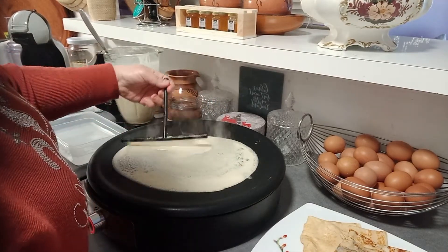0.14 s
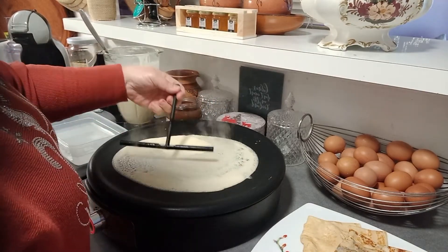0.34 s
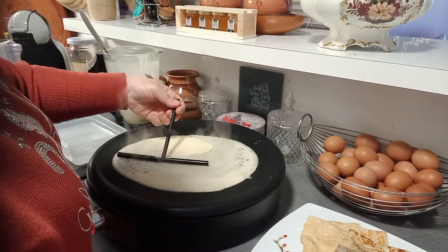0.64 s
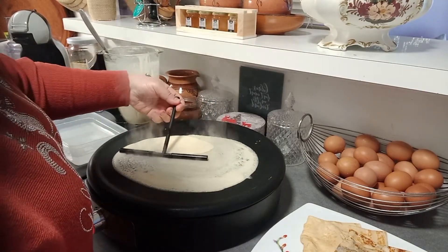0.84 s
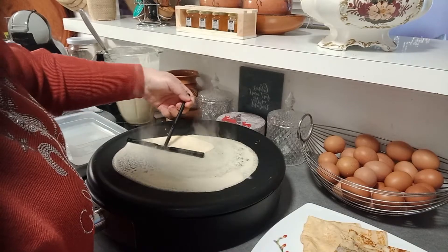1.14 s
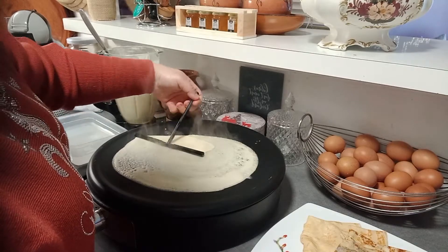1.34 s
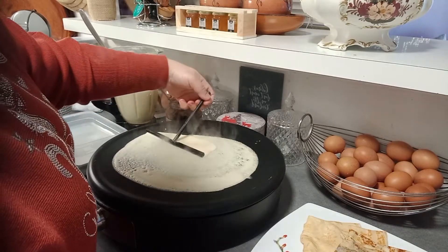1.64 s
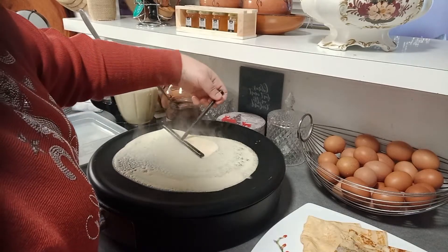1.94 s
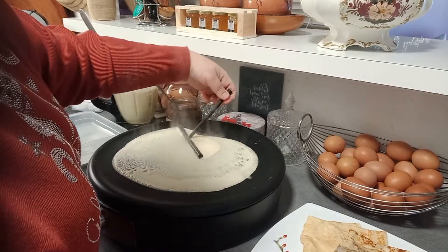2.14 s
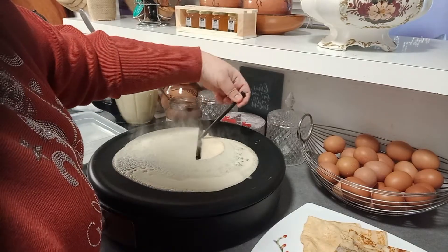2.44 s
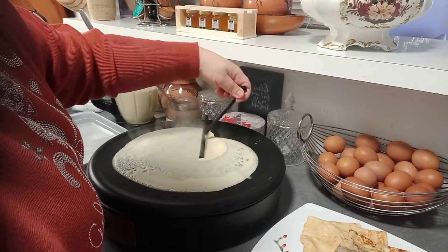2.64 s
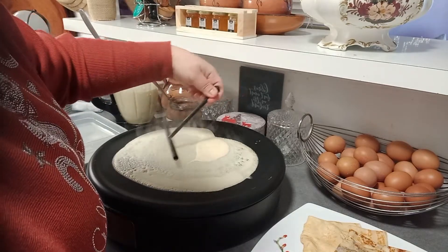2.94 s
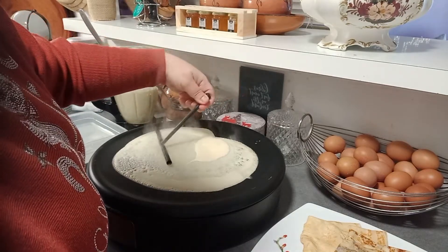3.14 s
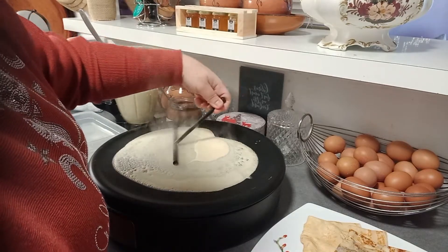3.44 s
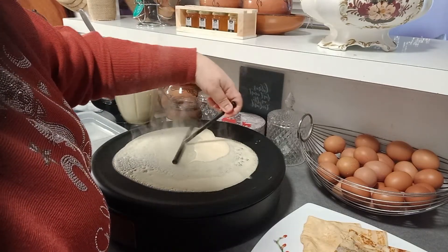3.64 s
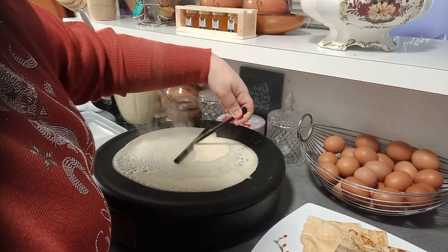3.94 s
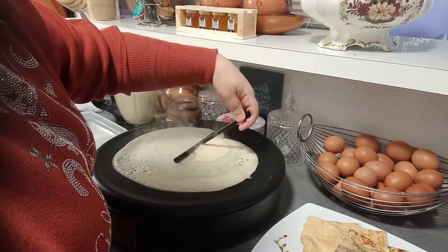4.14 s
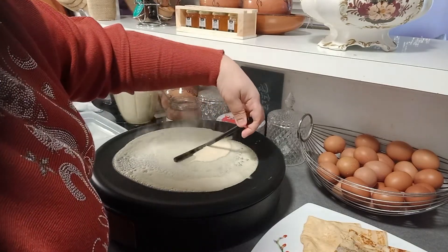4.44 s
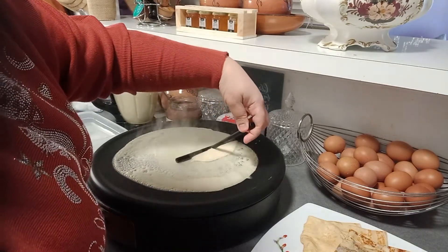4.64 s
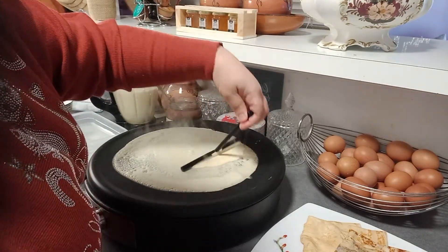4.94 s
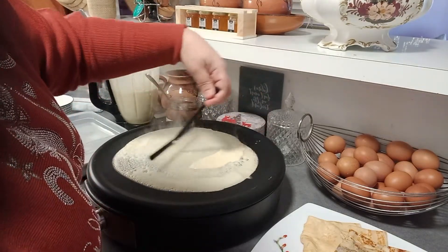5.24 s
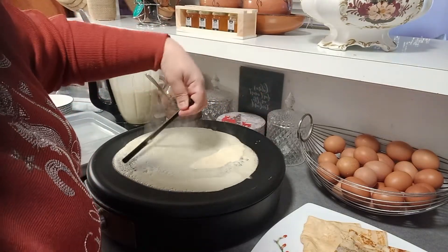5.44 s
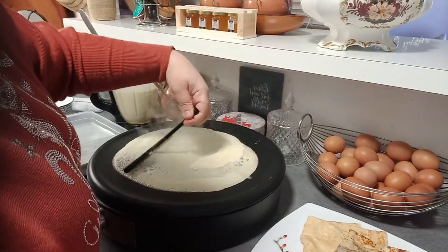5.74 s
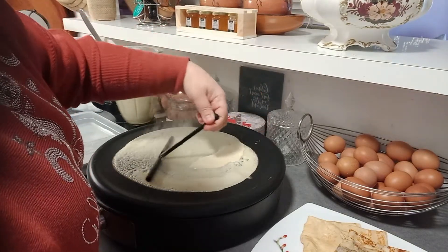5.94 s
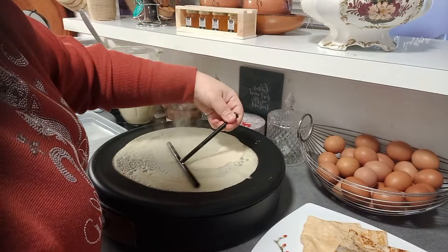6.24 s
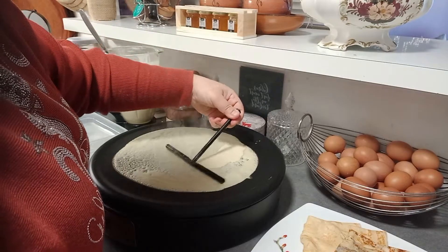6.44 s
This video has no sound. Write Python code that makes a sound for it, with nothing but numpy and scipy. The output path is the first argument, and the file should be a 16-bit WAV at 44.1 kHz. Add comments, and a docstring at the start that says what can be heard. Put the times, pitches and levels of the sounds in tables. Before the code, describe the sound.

Wet crepe batter hisses in swells under a lightly scraping spreader, settling into faint fizz and tiny pops over a low kitchen hum.

```python
"""Crepe batter is spread with a T-shaped rake on a hot electric plate in a small, humming kitchen.
At first one push is dying away. From 1 to 2.6 s a long push feeds wet batter onto bare metal: a full
sizzle swells within the fine fizz of bursting steam bubbles, while friction makes the rake scrape and
judder and the plate ring softly. Blisters pop in the lull, and two shorter pushes follow from 3.9 s.
After 4.8 s the drying film calms towards a simmer, with spurts, pops and two last faint pushes."""
import sys
import numpy as np
from scipy import signal
from scipy.fft import rfft, irfft
from scipy.io import wavfile

SR = 44100
rng = np.random.default_rng(int(sys.argv[2]) if len(sys.argv) > 2 else 0)


def int16_out(signal):
    """Quantize to a 16-bit WAV file."""
    q = np.round(np.clip(np.atleast_2d(signal).T, -1, 1) * 32767)
    wavfile.write(sys.argv[1], SR, q.astype(np.int16))


N = 291060
T, HZ = np.arange(N) / SR, np.fft.rfftfreq(N, 1 / SR)
SLOW_T = T[::64]  # coarse time axis for envelopes

def amp(db):
    """The decibel law: 20 dB is a factor of ten in amplitude."""
    return np.exp(np.asarray(db) * (np.log(10) / 20))

def unit(x):
    """Normalisation to rms 1."""
    return x / np.sqrt(np.mean(x ** 2) + 1e-20)

def read(points, hz=HZ):
    """Interpolation of a table in log frequency."""
    f, value = np.transpose(points)
    return np.interp(np.log(hz + 1), np.log(f + 1), value)

def follow(rows, column):
    """Interpolation of one column in time."""
    rows = np.asarray(rows)
    return np.interp(T, rows[:, 0], rows[:, column])

def colour(x, spectrum):
    """Minimum-phase filtering is causal, so clicks keep their sharp front."""
    log_gain = np.log(amp(read(spectrum, abs(np.fft.fftfreq(4096, 1 / SR)))))
    taps = np.fft.ifft(np.exp(np.conj(signal.hilbert(log_gain)))).real[:1024]
    return signal.oaconvolve(x, taps[None] / np.linalg.norm(taps), axes=1)[:, :N]

def wander(rate_hz):
    """Random modulation: slow noise of rms 1, up to about the given rate."""
    hz = np.fft.rfftfreq(len(SLOW_T), SLOW_T[1])
    spectrum = rfft(rng.standard_normal(len(SLOW_T))) * hz / (hz + 2) / (1 + (hz / rate_hz) ** 2)
    return np.interp(T, SLOW_T, unit(irfft(spectrum, len(SLOW_T))))

def resonance(hz, half_width):
    """A Lorentzian peak: the gain halves at half_width Hz from its centre."""
    return 1 / (1 + ((HZ - hz) / half_width) ** 2)

def surge(start, end, rise_s, fall_db_per_s, climb_db=0, crest_s=.002):
    """Growth and decay: a gain climbs ever more slowly, rounds off and falls exponentially."""
    onset = np.clip((SLOW_T - start) / rise_s, 0, 1)
    remaining = np.clip((end - SLOW_T) / (end - start), 0, 1)
    past_s = crest_s * np.logaddexp(0, (SLOW_T - end) / crest_s)
    return onset * amp(-climb_db * remaining ** 2 - fall_db_per_s * past_s)

def power_sum_db(gains):
    """Incoherent sounds add in power."""
    return np.interp(T, SLOW_T, 10 * np.log10(sum(gain ** 2 for gain in gains) + 1e-12))

# Likeness of the two ears. Each row: frequency in Hz, correlation from 0 to 1.
COHERENCE = [(40, 0), (130, 0.35), (300, 0.63), (500, 0.29), (900, 0.094), (3000, 0)]
def stereo_noise(gain):
    """Interaural coherence: shaped noise is most alike in both ears near 300 Hz."""
    a, b = rfft(rng.standard_normal((2, N)))
    same = np.clip(read(COHERENCE), -1, 1)
    return unit(irfft(np.array([a, same * a + np.sqrt(1 - same ** 2) * b]) * gain, N))

# Room noise. Each row: frequency in Hz, relative level in dB.
ROOM_NOISE = [(15, -48), (30, -34), (50, -19), (75, -5), (100, -1.5), (150, -0.5), (190, -7), (250, 3.5),
              (350, -3.5), (450, 0), (560, -14), (950, -16.5), (1400, -12.5), (2500, -25), (8000, -26.5)]
# Tones of an appliance. Each row: frequency in Hz, level in dB.
HUM_TONES = [(263.5, -82.5), (300, -86)]
def background(air_db=-72, waver_turns=0.16, throb_db=2):
    """Room noise lies under an appliance's hum, modulated in amplitude and phase."""
    hum = 0
    for hz, db in HUM_TONES:
        gain = amp(db + throb_db * wander(rate_hz=5.8))
        hum += gain * np.sin(2 * np.pi * (hz * T + waver_turns * wander(rate_hz=3.7)))
    return amp(air_db) * stereo_noise(amp(read(ROOM_NOISE))) + np.sqrt(2) * hum

# Decay of the furnished room. Each row: frequency in Hz, time to fall 60 dB in seconds.
REVERB_TIMES = [(300, 0.19), (2000, 0.41), (8000, 0.23), (15000, 0.15)]
def reverberation(x, tail_db=-6, shift_per_s=1.702, count=3):
    """Diffuse reflections decay exponentially; their pattern shifts as the arm moves."""
    t, out = np.arange(SR // 4) / SR, x
    for k in range(count):
        noise = rng.standard_normal((2, len(t))) * (t > .006)
        hz, age, bands = signal.stft(noise, SR, nperseg=256)
        tail = signal.istft(bands * amp(-60 * age / read(REVERB_TIMES, hz)[:, None]), SR, nperseg=256)[1]
        tail /= np.linalg.norm(tail[0])
        share = np.cos(np.pi * (shift_per_s * T + k / count)) * np.sqrt(2 / count)
        out = out + amp(tail_db) * signal.oaconvolve(x * share, tail, axes=1)[:, :N]
    return out

def reflections(x, echo_db, echo_s=0.0032):
    """Early reflections from plate, wall, shelf and jars follow the direct sound."""
    t = np.arange(SR // 60) / SR
    taps = rng.standard_normal((2, len(t))) * (rng.random((2, len(t))) < .25)
    taps *= (t > .0004) * np.exp(-t / echo_s)
    response = (t == 0) + amp(echo_db) * taps / np.linalg.norm(taps, axis=1, keepdims=True)
    return signal.oaconvolve(x, response, axes=1)[:, :N]

# The rake dips into the batter. Each row: centre in seconds, half length in seconds, level in dB.
DIPS = [(.37, .08, -71), (0.8, .055, -65), (.985, .03, -73), (4.02, .04, -75), (4.674, 0.043, -74),
        (5.998, .045, -76)]
def squelches():
    """Squeezed froth gives band-limited noise under Gaussian envelopes."""
    swell = sum(amp(db) * np.exp(-((T - centre) / half_s) ** 2) for centre, half_s, db in DIPS)
    return swell * stereo_noise(resonance(hz=830, half_width=260))

# The rake catches. Each row: start in seconds, length in seconds, pitch in Hz, level in dB.
CATCH_TONES = [(-.08, 0.24, 429, -61.5), (0.736, 0.19, 232, -65), (0.758, 0.09, 425, -65),
               (4.635, .15, 415, -60), (4.67, 0.14, 300, -70), (4.747, 0.35, 419, -70)]
def catches(waver=0.021, rough_db=0.5, ear_radians=0.4):
    """Brief stick-slip friction makes one resonance sing in a soft, wavering tone."""
    out = np.zeros((2, N))
    drift, rough = wander(rate_hz=89), amp(rough_db * wander(rate_hz=29))
    for start, length, hz, db in CATCH_TONES:
        swell = np.sin(np.pi * np.clip((T - start) / length, 0, 1))
        phase = 2 * np.pi * (np.cumsum(hz * (1 + waver * drift)) / SR + rng.random())
        out += amp(db) * swell * np.sin([phase + ear_radians, phase])
    return rough * out

# The rake judders. Each row: start in seconds, length in seconds, pitch in Hz, level in dB.
SLIP_RUNS = [(0, 0.046, 436, -65), (1.951, 0.037, 450, -64), (2.002, .11, 460, -60),
             (2.132, .035, 417, -60.5), (2.205, 0.055, 485, -65)]
def judders(slips_per_s=56, uneven=0.295, ring_s=0.013, detune=0.056, ear_radians=0.68):
    """Stick-slip in quick, uneven jerks: each slip excites a damped oscillation."""
    out, t = np.zeros((2, N)), np.arange(SR // 20) / SR
    envelope = np.sqrt(t / ring_s) * np.exp(-2 * t / ring_s)
    for start, length, hz, db in SLIP_RUNS:
        slips, count = np.zeros((2, N)), max(round(length * slips_per_s), 1)
        for k, (late, off_pitch) in enumerate(rng.uniform(-1, 1, (16, 2))[:count]):
            age = max(k + uneven * late, 0) / slips_per_s
            phase = 2 * np.pi * hz * (1 + detune * off_pitch) * t
            ring = envelope * np.sin([phase + ear_radians, phase])
            at = round((start + age) * SR)
            slips[:, at:at + len(t)] += ring * (1 + np.sin(np.pi * age / length))
        out += amp(db) * unit(slips) * np.sqrt(length * SR / N)
    return out

# Ploughing through deep batter. Each row: start, end and rise in seconds, level and climb in dB,
# decay in dB per second.
PLOUGHS = [(-.1, 0.158, .05, -67, 0, 41), (1.25, 2.17, .15, -63.5, 8.5, 50)]
# Hollow voice of the scrape. Each row: frequency and half width in Hz, gain in dB.
SCRAPE_MODES = [(468, 48, -1.5), (650, 54, 0)]
def scrape(slip_db=2.5):
    """Friction drives resonances; quick slips roughen them by amplitude modulation."""
    swell_db = power_sum_db(amp(db) * surge(start, end, rise, fall, climb)
                            for start, end, rise, db, climb, fall in PLOUGHS)
    voice = stereo_noise(sum(amp(db) * resonance(hz, width) for hz, width, db in SCRAPE_MODES))
    return voice * amp(swell_db + slip_db * wander(rate_hz=55))

# Pushes of the rake. Each row: start, end and sizzle rise in seconds, sizzle level, fizz level and
# sizzle climb in dB, decay in dB per second.
PUSHES = [(-0.8842, 0.065, .1, -53.5, -44.5, 1, 14.5), (1.0131, 2.62, 0.32, -53.5, -45.5, 6.5, 30.5),
          (3.88, 4.4, .1, -60, -53, 2.5, 18.5), (4.464, 4.75, .135, -60, -50, -2, 37),
          (5.916, 5.95, 0.036, -74, -77, -0.5, 30), (6.5, 6.58, .065, -78, -68.5, 7, 22)]
# The rake bears harder. Each row: start and rise in seconds, level in dB, decay in dB per second.
HARD_PRESSES = [(-.06, 0.046, -60, 24), (.73, .07, -65.5, 25), (1.95, .2, -67, 48), (3.98, 0.26, -65, 15.5),
                (4.62, .06, -68, 42)]
def rub_level(slide_db=-76.5, push_db=-68.5, rub_per_sizzle=0.46):
    """Friction grows with the batter moved; sliding, pushes and presses add in power."""
    fullest_db = max(row[3] for row in PUSHES)
    pushes = [amp(push_db + rub_per_sizzle * (db - fullest_db))
              * surge(start, end, rise_s=0.25, fall_db_per_s=28) for start, end, _, db, *_ in PUSHES]
    presses = [amp(db) * surge(start, start + rise, rise, fall) for start, rise, db, fall in HARD_PRESSES]
    return power_sum_db([amp(slide_db)] + pushes + presses)

# Batter ahead of the rake. Each row: time in seconds, depth from 0 to 1, sizzle body gain in dB.
BATTER = [(0, 0.81, 5.5), (.35, 0.84, 4), (1.05, 0.7, -3.5), (1.35, 0.58, 6.5), (1.8, .95, 1.5),
          (2.15, 0.93, 1), (2.37, 0.57, 3.5), (2.9, 0.48, 0.5), (4.1, 0.32, 3), (4.45, 0.16, 2),
          (4.7, 0.13, -4.5), (5, 0.14, -11), (6.6, .8, 3)]
# Resonances of plate and rake. Each row: frequency and half width in Hz, gain in dB.
PLATE_MODES = [(149, 15, -6.5), (251, 30, -6.5), (312, 47, 1), (425, 24, 3.5), (475, 22, 2),
               (632, 44, -0.5)]
def rub(resting_db=-73, drag_db=9, crossover_hz=380):
    """Forced vibration: friction stirs the plate's modes, with a lower voice in thin batter."""
    rub_db, thinness = rub_level(), .5 - follow(BATTER, column=1)
    pressed = 1 / np.sqrt(1 + amp(resting_db - rub_db) ** 2)
    body = sum(amp(db) * resonance(hz, width) for hz, width, db in PLATE_MODES)
    high_pass = 1 / (1 + (crossover_hz / (HZ + 1)) ** 4)
    low, high = amp(drag_db * thinness / 2), amp(-drag_db * thinness / 2)
    voice = low * stereo_noise(body * (1 - high_pass)) + high * stereo_noise(body * high_pass)
    return voice / np.hypot(low, high) * pressed * amp(rub_db + wander(rate_hz=14))

# Escapes of trapped steam. Each row: start in seconds, fizz level and sizzle level in dB.
STEAM_SPURTS = [(1.264, -53, -74), (3.245, -66, -80), (3.33, -62, -82), (3.39, -66, -83), (3.49, -61, -75),
                (4.306, -51.5, -76), (4.93, -61, -75), (5.055, -55, -76), (5.335, -67, -68.5),
                (5.405, -66, -76), (5.48, -64, -77), (5.586, -66, -72), (5.745, -66, -81), (6.18, -70, -80)]
def spurt(start, rise_s=.014):
    """A transient envelope: steam escapes abruptly and dies away exponentially."""
    return surge(start, start + rise_s, rise_s, fall_db_per_s=114)

CREST_S = 0.042  # the arm eases off, which rounds the crest of a push
def boil_level(rise_s=0.063, climb_db=8, linger_db=-13.5, drying_db_per_s=5, simmer_db=-73.5):
    """Boiling grows with the wetted patch, then decays in two stages: it calms fast and dries slowly."""
    gains = [amp(simmer_db)] + [amp(db) * spurt(start) for start, db, _ in STEAM_SPURTS]
    for start, end, _, _, db, _, fall in PUSHES:
        gains.append(amp(db) * surge(start, end, rise_s, fall, climb_db, CREST_S))
        gains.append(amp(db + linger_db) * surge(start, end, rise_s, drying_db_per_s, climb_db))
    return power_sum_db(gains)

def wet_level():
    """Wet batter sizzles while the rake feeds it and decays exponentially as it sets."""
    pushes = [amp(db) * surge(start, end, rise, fall, climb, CREST_S)
              for start, end, rise, db, _, climb, fall in PUSHES]
    return power_sum_db(pushes + [amp(db) * spurt(start) for start, _, db in STEAM_SPURTS])

# Bursting steam, shared by spits, pops and fizz. Each row: frequency in Hz, relative level in dB.
STEAM_SPECTRUM = [(300, -44), (850, -19.5), (1250, -18), (1900, -10), (2900, -12.5), (4000, -6.5),
                  (5200, -4.5), (6350, -10), (7100, -5.5), (7800, -4.5), (8600, -2), (9700, -3.5),
                  (12600, 1.05), (15800, -3.5)]
def spits(level_db=-76, per_s=95, spread_db=1.3, puff_s=.0024, per_boil=0.79, simmer_db=-73.5):
    """A clustered Poisson process: small blisters spit in flurries, louder in a hard boil."""
    draw = rng.random(N) * SR / (per_s * amp(3.5 * wander(rate_hz=12)))
    openings = (draw < 1) * amp(-spread_db * np.log(draw + .02))
    envelope = signal.lfilter([1], [1, -np.exp(-1 / (puff_s * SR))], openings)
    puffs = signal.lfilter(*signal.butter(1, 1600, "high", fs=SR), envelope * rng.standard_normal((2, N)))
    return unit(colour(puffs, STEAM_SPECTRUM)) * amp(level_db + per_boil * (boil_level() - simmer_db))

# The loudest blisters. Each row: start in seconds, relative level in dB, left minus right in dB,
# low cutoff in Hz.
BLISTERS = [(0.7378, -29.5, 0, 4000), (.879, -32, 0, 6000), (1.2895, -32, 0, 7010), (1.6118, -29, -1, 4007),
            (2.9263, -33, 0, 4000), (3.039, -36.5, 0, 4000), (3.2535, -37, -5, 7000),
            (3.3427, -40, 5, 7000), (3.4074, -35, 0, 5500), (3.5034, -42, -2, 4000),
            (3.5714, -44, -2, 4000), (3.588, -42, -1, 6000), (4.9215, -43, -2, 3000),
            (5.0234, -36.5, 6, 1500), (5.044, -34, -2, 2000), (5.0663, -33, 1, 1500), (5.079, -35, 0, 2500),
            (5.0886, -38, 1, 6000), (5.2424, -38, 0, 1000), (5.345, -41, 0, 1000), (5.3554, -38, -2, 3500),
            (5.404, -39, -1, 1500), (5.4965, -39, -4, 4500), (5.512, -40, 0, 7000), (5.6602, -50, 0, 7000),
            (5.9662, -43.5, 0, 6000), (5.9816, -43, 2, 4000)]
def pops(level_db=1.5, puff_db=-14, puff_s=0.0015):
    """Impulsive release: a blister snaps and puffs steam; each has its own low cutoff, so some sound thinner
    than others."""
    out, t = np.zeros((2, N)), np.arange(SR // 30) / SR
    for start, db, pan_db, low_hz in BLISTERS:
        snap = (t == 0) + amp(puff_db) * np.exp(-t / puff_s) * rng.standard_normal((2, len(t)))
        snap = signal.lfilter(*signal.butter(2, low_hz, "high", fs=SR), snap)
        at = round(start * SR)
        out[:, at:at + len(t)] += snap * amp([[db + pan_db / 2], [db - pan_db / 2]])
    return amp(level_db) * reflections(colour(out, STEAM_SPECTRUM), echo_db=-0.5)

# The rake's path from left to middle. Each row: time in seconds, lead at the left ear in milliseconds.
RAKE_PATH = [(0, 0.16), (1.5, .16), (2.1, 0.13), (2.7, 0.057), (3.3, .12), (4, 0.055), (5, 0.019),
             (6.6, .09)]
def bubbles(per_s, spread_db, roam_db, echo_db, scatter_ms, spots):
    """Shot noise: bursts of random size roam between spots near the rake, each with its own echoes."""
    out, lead_ms = np.zeros((2, N)), follow(RAKE_PATH, column=1)
    activity = np.array([amp(roam_db * wander(rate_hz=5)) for _ in range(spots)])
    offset_ms = scatter_ms * rng.standard_normal(N)
    for share in activity / np.linalg.norm(activity, axis=0) / np.sqrt(per_s):
        draw = rng.uniform(-1, 1, N) * (spots * SR / per_s)
        at = np.flatnonzero(abs(draw) < 1)
        size = share[at] * np.sign(draw[at]) * amp(-spread_db * np.log(abs(draw[at]) + .004))
        lead = np.rint((lead_ms[at] + offset_ms[at]) * SR / 1000).astype(int)
        ears = [np.bincount((at - lead) % N, size, N), np.bincount(at, size, N)]
        out += reflections(np.array(ears), echo_db)
    return unit(out)

def blips(depth, per_s=400, low_hz=2000, high_hz=9000, cycles=7, spread_db=3.4, rise_per_s=12):
    """Bubble resonance: each rings briefly and rises in pitch, larger and lower in deep batter."""
    t = np.arange(SR // 110) / SR
    rate = per_s * amp(4 * wander(rate_hz=35))  # they open in clumps
    at = np.flatnonzero((rng.random(N) < rate / SR)[:-len(t)])
    pitch, size = rng.random((N // 20, 2))[:len(at)].T[:, :, None]
    hz = low_hz * (high_hz / low_hz) ** pitch / (1 + depth[at, None] / 2)
    envelope = amp(-spread_db * np.log(size + .02)) * np.exp(-hz * t / cycles)
    samples, ears = (at[:, None] + np.arange(len(t))).ravel(), []
    for lead_s in (follow(RAKE_PATH, column=1)[at, None] / 1000, 0):
        rings = envelope * np.sin(2 * np.pi * hz * (t + rise_per_s * t ** 2 / 2 + lead_s))
        ears.append(np.bincount(samples, rings.ravel(), N))
    return unit(reflections(np.array(ears), echo_db=3))

# Wet sizzle and low froth. Each row of both: frequency in Hz, relative level in dB.
SIZZLE_SPECTRUM = [(250, -33.5), (600, -26), (860, -16), (1130, -4.5), (1500, -7), (1780, 0.5), (1950, 1),
                   (2200, -1.6), (2450, 0.6), (3000, -1), (4000, -2.6), (5300, -10), (6400, -12),
                   (8000, -13), (15000, -21)]
FROTH_SPECTRUM = [(250, -28.5), (480, -6), (660, -0.5), (830, 0), (1000, 2), (1200, 3.5), (1600, -1),
                  (2500, -3), (6000, -51)]
def wet_sizzle(level_db=1.59, dry_db=-81, blips_db=-4.5, froth_db=-6, body_hz=1250, body_width_hz=420):
    """Boiling on contact: fresh batter makes larger, fuller bubbles, and froth where it lies deep."""
    wet_db, depth = wet_level(), np.clip(follow(BATTER, column=1), 0, 1)
    fed = 1 / (1 + amp(dry_db - wet_db) ** 2)  # dies once the rake stops feeding it
    bursts = bubbles(per_s=3000, spread_db=2, roam_db=5.5, echo_db=1, scatter_ms=.025, spots=6)
    sizzle = unit(colour(bursts, SIZZLE_SPECTRUM))
    body = signal.lfilter(*signal.iirpeak(body_hz, body_hz / body_width_hz, SR), sizzle)
    sizzle += body * (amp(follow(BATTER, column=2)) - 1)
    foam = bubbles(per_s=2500, spread_db=3, roam_db=10.5, echo_db=-4.5, scatter_ms=.028, spots=3)
    froth = unit(colour(foam, FROTH_SPECTRUM)) * depth ** 2
    voice = sizzle + amp(blips_db) * blips(depth) + amp(froth_db) * froth
    return voice * fed * amp(level_db + wet_db + 0.55 * wander(rate_hz=17))

def fizz(level_db=3.3, per_s=3600, middling_db=-58, doubling_db=6, steam_db=-4, flutter_db=0.79):
    """Shot noise of the steaming film: dense bursts merge into hiss, sparser ones tick as it calms."""
    boil_db = boil_level()
    rate = per_s * 2 ** ((boil_db - middling_db) / doubling_db) + per_s / 2
    bursts = bubbles(rate, spread_db=3.5, roam_db=3, echo_db=2, scatter_ms=.018, spots=6)
    steam = amp(steam_db) * rng.standard_normal((2, N))
    voice = unit(colour(bursts + steam, STEAM_SPECTRUM))
    return voice * amp(level_db + boil_db + flutter_db * wander(rate_hz=21))

# A hollow in the sound. Each row: time in seconds, centre in Hz, depth from 0 to 1.
NOTCH_PATH = [(.1, 900, .9), (.22, 764, 1), (.48, 810, 0.7), (.63, 930, 1), (.8, 890, 0.2),
              (1.1, 960, 0.75), (1.35, 870, 1), (1.55, 825, 0.8), (1.85, 930, .4), (2.2, 900, 0.44),
              (2.36, 830, 1), (2.48, 840, 0.5), (2.6, 825, 1), (2.92, 830, 0.9), (3.02, 830, 0),
              (4, 860, 0.35), (4.2, 885, 1), (4.45, 850, 1), (4.68, 790, .4), (4.85, 830, 0.55),
              (6.6, 850, 0.2)]
def hollow(x, width_hz=135, drift=0.054, order=2):
    """Cancellation of a narrow band: a notch near 850 Hz drifts, opens and closes."""
    centre_hz = follow(NOTCH_PATH, column=1) * (1 + drift * wander(rate_hz=3.4))
    carrier = np.exp(2j * np.pi * np.cumsum(centre_hz) / SR)
    pole = np.exp(-np.pi * width_hz / SR)
    cut = 1 - (1 - np.clip(follow(NOTCH_PATH, column=2), 0, 1)) ** (1 / order)
    for _ in range(order):
        band = 2 * (carrier * signal.lfilter([1 - pole], [1, -pole], x * carrier.conj())).real
        x = x - cut * band
    return x

def scene():
    """Superposition at the two ears; the sizzle drifts to the right with the rake."""
    side_db = (-0.23 - 0.13 * T) / 2
    boiling = (fizz() + wet_sizzle()) * amp([side_db, -side_db])
    frying = reverberation(boiling + pops() + spits())
    return hollow(frying + rub() + scrape() + background()) + squelches() + catches() + judders()

# Colour of the microphone ports. Each row: frequency in Hz, left minus right in dB.
PORT_BALANCE = [(500, 0), (1400, -0.5), (2800, 1.5), (4400, 1.9), (6200, -2.5), (7300, 0), (8100, -4),
                (9100, 2.5), (11000, -3.5), (12600, 1), (14200, -4), (15400, 11)]
def record(dry, bass_cut_hz=42, top_hz=15870):
    """Frequency response: each port has its own colour and loses the deepest bass and highest treble."""
    lean_db = read(PORT_BALANCE) / 2
    high_pass = HZ ** 2 / np.hypot(HZ ** 2, bass_cut_hz ** 2)
    heard = irfft(rfft(dry) * amp([lean_db, -lean_db]) * high_pass, N)
    low_pass = signal.firwin(801, top_hz, window=("kaiser", 8), fs=SR)
    return signal.oaconvolve(heard, low_pass[None], "same")

dry = scene()
out = record(dry)
int16_out(out)
```